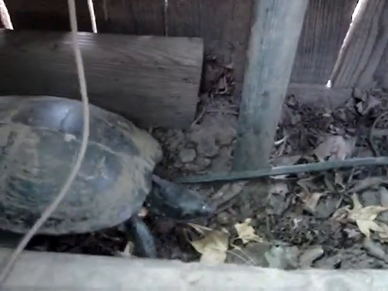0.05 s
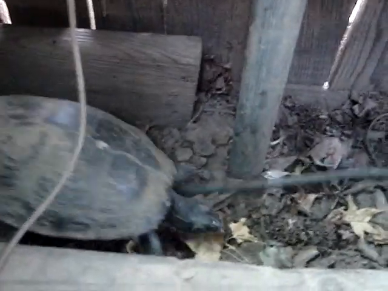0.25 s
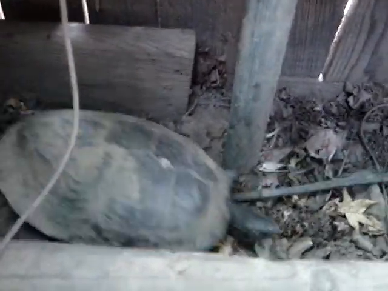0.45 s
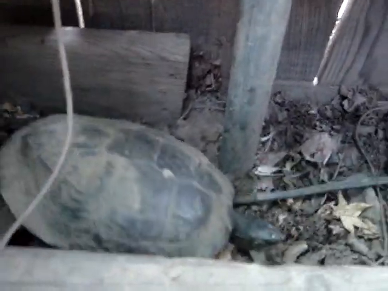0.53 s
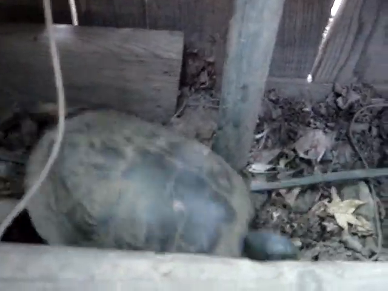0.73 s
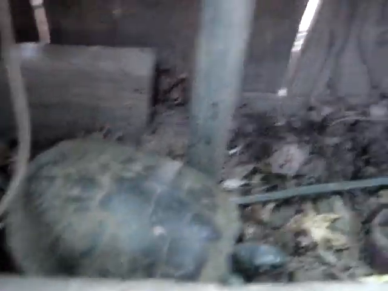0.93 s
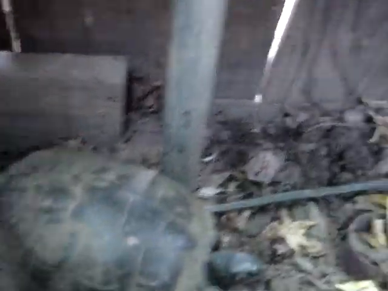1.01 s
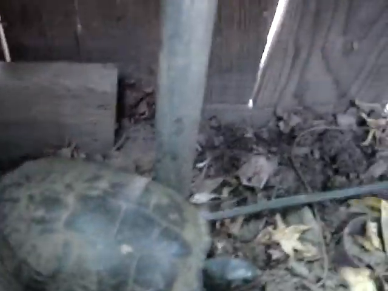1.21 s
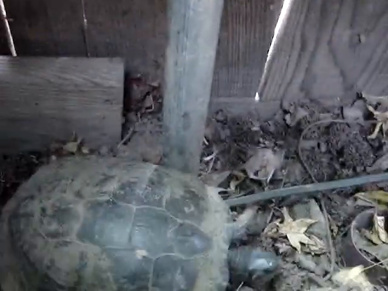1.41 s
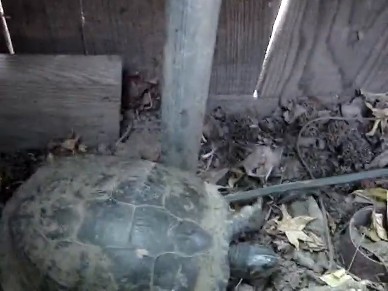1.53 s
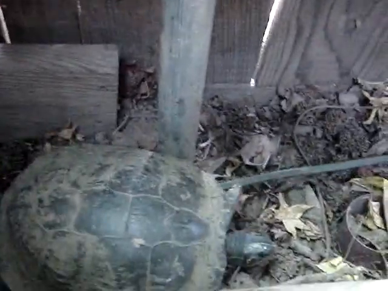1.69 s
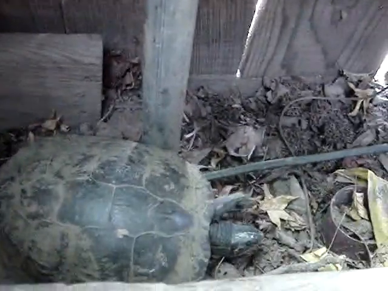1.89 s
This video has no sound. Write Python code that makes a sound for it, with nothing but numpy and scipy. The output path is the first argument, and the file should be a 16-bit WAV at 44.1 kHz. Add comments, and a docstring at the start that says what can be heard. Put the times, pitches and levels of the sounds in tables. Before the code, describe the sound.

Dry leaves crackle and twigs snap as a turtle crawls close by outdoors. Its claws scratch, its shell drags and knocks on wooden boards, and a few soft thumps sound before the rustling eases over a steady hiss.

```python
"""Turtle in dry leaves

A turtle crawls over dry leaves and dirt between wooden boards, outdoors. Leaves crackle under each
push, twigs snap and claws scratch; the shell drags along the wood and knocks against it, and both ring.
Four soft low thumps come with a short sizzle; behind it all are a steady hiss and a faint hum."""
import sys
import numpy as np
from scipy import signal
from scipy.fft import rfft, irfft
from scipy.io import wavfile

SR = 44100
rng = np.random.default_rng(int(sys.argv[2]) if len(sys.argv) > 2 else 0)


def output_pcm(signal):
    """Save a mono or channel-first signal as 16-bit PCM at the path in sys.argv[1].

    Samples are clipped to [-1, 1] before scaling.
    """
    pcm = np.clip(np.atleast_2d(signal).T, -1, 1) * 32767
    wavfile.write(sys.argv[1], SR, np.round(pcm).astype(np.int16))


N = 85995
T = np.arange(N) / SR


def from_db(db):
    """Decibels to gain."""
    return 10 ** (np.asarray(db) / 20)


def unit_rms(x):
    """Scale to rms 1."""
    return x / np.sqrt(np.mean(x ** 2) + 1e-20)


def drift(hz):
    """A smooth random wander, mostly slower than hz; rms 1."""
    step, settle = 20, 2000
    pole = np.exp(-2 * np.pi * hz * step / SR)
    noise = rng.standard_normal(N // step + settle + 2)
    slow = signal.lfilter([1], [1, -2 * pole, pole * pole], noise)[settle:]
    return np.interp(np.arange(N) / step, np.arange(len(slow)), unit_rms(slow))


def swell(at, rise, fall):
    """A rounded rise to 1 and fall back to silence."""
    return np.sin(np.pi / 2 * np.interp(T, [at - rise, at, at + fall], [0, 1, 0])) ** 2


def grains(per_s, spread_db):
    """Random clicks of uneven size."""
    clicks = (rng.random(N) < per_s / SR) * rng.choice([-1, 1], N)
    return clicks * from_db(spread_db * np.minimum(rng.exponential(1, N), 4)) + 1e-18


def bandpass(x, low, high, order=1):
    """Keep the band from low to high Hz."""
    return signal.sosfilt(signal.butter(order, [low, high], "band", fs=SR, output="sos"), x)


def ring(x, hz, t60):
    """One decaying mode; it radiates no deep bass."""
    radius, angle = from_db(-60 / (t60 * SR)), 2 * np.pi * hz / SR
    mode = signal.lfilter([.5, 0, -.5], [1, -2 * radius * np.cos(angle), radius ** 2], x + 1e-18)
    return bandpass(mode, hz / 2, hz * 2)


def coloured(sources, spectrum, flicker_db):
    """Half-octave bands, fed in turn from the sources, each with its own level and flicker; rms 1."""
    edges = 10800 / 2 ** np.arange(8.6, -.1, -.5)
    hz, db = np.transpose(spectrum)
    out = 0
    for k, (low, high) in enumerate(zip(edges, edges[1:])):
        level = np.interp(np.log(low * high) / 2, np.log(hz), db)
        band = bandpass(sources[k % len(sources)], low, high, order=2)
        out += band * from_db(level + flicker_db * drift(25))
    return unit_rms(out)


def background():
    """A bed of even outdoor hiss and a faint hum whose phase wavers."""
    # hum tones: (frequency [Hz], level [dB])
    tones = [(118.5, -57), (1039, -57)]
    # colour of the outdoor air: (frequency [Hz], relative density [dB])
    air = [(30, -24), (60, -2), (100, 4), (200, 1), (350, -10.5), (600, -4), (1000, -4), (1600, -7),
           (3500, -12), (7000, -18), (10000, -52.5)]
    hum = sum(from_db(db) * unit_rms(np.sin(2 * np.pi * hz * T + 0.25 * drift(24))) for hz, db in tones)
    hiss = coloured(rng.standard_normal((2, N)), air, flicker_db=1.2)
    return hum + from_db(-45) * hiss


def board_reflections(x):
    """A short spray of reflections between the boards, starting after 4 ms."""
    t, t60 = T[:SR // 4], 0.097
    tail = rng.standard_normal(len(t)) * from_db(-60 * t / t60) * (t > .004)
    return from_db(-18.5) * signal.fftconvolve(x, tail / np.linalg.norm(tail))[:N]


def thumps():
    """Soft, one-sided pulses of pressure, each topped with a short bright sizzle."""
    # thump cues: (start [s], peak [dB], sizzle level [dB])
    cues = [(0.419, -31.5, -40), (0.721, -34, -31), (1.212, -34.5, -36.5), (1.526, -33, -30.5)]
    # colour of the sizzle: (frequency [Hz], relative density [dB])
    colour = [(2000, -25), (4500, -32), (7000, 32), (10000, -6.5)]
    sizzle = coloured(rng.standard_normal((2, N)), colour, flicker_db=-0.5)
    out = 0
    for start, db, sizzle_db in cues:
        out += from_db(db) * swell(start + 0.0045, rise=0.0045, fall=0.044)
        out += from_db(sizzle_db) * sizzle * swell(start + 0.006, rise=0.006, fall=0.016)
    return out


def claw_scratches():
    """Fast slips of a claw ring a leaf in one broad resonance."""
    # claw strokes: (peak time [s], rise [s], fall [s], level [dB], centre [Hz], width [Hz])
    strokes = [(0.201, 0.072, 0.036, -39.5, 900, 250), (0.399, 0.098, 0.092, -31.5, 3660, 915),
               (.44, 0.015, 0.045, -34, 2030, 457), (.945, 0.064, 0.035, -35, 2130, 900),
               (1.08, 0.028, 0.032, -45, 834, 199), (1.85, .14, 0.43, -44.5, 1630, 790)]
    out = 0
    for at, rise, fall, db, hz, width in strokes:
        low, high = max(hz - width / 2, hz / 2), hz + width / 2
        slips = grains(per_s=3100, spread_db=4)
        rasp = bandpass(bandpass(slips, low, high), low, high)
        out += from_db(db) * swell(at, rise, fall) * unit_rms(rasp)
    return out


def shell_on_boards():
    """The shell's stick-slip drags and its knocks drive the same modes of shell and board."""
    # drags along the wood: (peak time [s], rise [s], fall [s], level [dB], upper mode offset [dB])
    drags = [(.27, 0.17, 0.14, -45, -5), (.37, 0.059, 0.063, -34.5, 3), (0.524, 0.069, 0.066, -34.5, -7.5),
             (0.598, 0.039, 0.18, -37.5, -5.5), (0.697, 0.048, 0.065, -30.5, -4),
             (0.761, .025, 0.063, -30.5, -5.5), (0.861, 0.03, 0.029, -31.5, -4.5),
             (1.339, 0.1, 0.055, -34, -4.5), (1.407, 0.019, 0.033, -36.5, 2)]
    # a bump, a hard rattling knock, two light taps: (start [s], strength [dB], contact length [s])
    knocks = [(.361, -15, 0.0032), (.7259, -11.5, 0.00084), (.7282, -16.5, 0.0013), (.7305, -17.5, .001),
              (.7328, -31.5, 0.0024), (0.857, -31, 0.0013), (1.404, -35, .0005)]
    # shell and board ringing together: (frequency [Hz], drag gain [dB], knock gain [dB], t60 [s])
    modes = [(196, -19.5, -4, 0.043), (292.4, 5, -26, 0.022), (392.5, -12.5, 4, 0.024),
             (707, -10, -1.5, 0.028), (887, 6.5, 3.5, 0.017), (1060, -21, -11, .025),
             (1177, -15, -1.5, 0.028)]
    upper_above_hz = 600
    lower = upper = blows = out = 0
    for at, rise, fall, db, upper_db in drags:
        pressure = from_db(db) * swell(at, rise, fall)
        lower += pressure
        upper += pressure * from_db(upper_db)
    for start, db, length in knocks:
        contact = swell(start + length / 2, length / 2, length / 2)   # shorter is brighter
        blows += from_db(db) * contact / contact.sum()
    slips = grains(per_s=700, spread_db=3)
    slips /= np.std(sum(from_db(db) * ring(slips, hz, t60) for hz, db, _, t60 in modes))
    for hz, drag_db, knock_db, t60 in modes:
        friction = slips * (upper if hz > upper_above_hz else lower)
        out += ring(from_db(knock_db) * blows + from_db(drag_db) * friction, hz, t60)
    return out


def snaps():
    """A leaf or twig breaks: a fast-dying burst of noise around one broad pitch."""
    # breaks: (start [s], level [dB], t60 [s], centre [Hz])
    breaks = [(.174, -32.5, 0.043, 4240), (0.204, -33.5, .03, 4000), (0.228, -30, 0.1, 6000),
              (.305, -27, .03, 3520), (0.342, -46, 0.018, 2500), (0.36, -37, 0.038, 2160),
              (.4, -27, .025, 3400), (0.416, -19, 0.023, 2250), (0.676, -29, 0.036, 4970),
              (.691, -17.5, 0.01, 7500), (0.704, -30.5, 0.04, 2500), (.719, -32, 0.025, 3500),
              (.7253, -12.5, 0.014, 1410), (0.754, -33, 0.034, 3280), (0.764, -16, 0.019, 3100),
              (0.778, -20, .025, 4000), (0.804, -31, 0.041, 2800), (0.849, -32.5, 0.071, 2600),
              (0.9, -37, .03, 7150), (.928, -31, 0.058, 8000), (0.959, -17, 0.013, 2260),
              (0.958, -28.5, 0.062, 9000), (.998, -30.5, 0.033, 4000), (1.021, -28.5, 0.015, 4970),
              (1.2101, -25.5, 0.029, 5400), (1.216, -15, 0.011, 7000), (1.2291, -15, 0.004, 9000),
              (1.252, -30.5, 0.055, 3000), (1.333, -31, 0.012, 5970), (1.347, -36, 0.008, 6000),
              (1.386, -25, 0.022, 5400), (1.404, -26.5, 0.028, 1200), (1.41, -23.5, 0.031, 1820),
              (1.468, -26.5, 0.032, 4360), (1.5264, -30, .02, 5500), (1.719, -33.5, 0.022, 4200),
              (1.748, -33, 0.041, 7460), (1.831, -35, 0.02, 7000)]
    attack_s, octave_loss_db = .0012, 5.5
    out, size = np.zeros(N + SR), SR // 10
    t = T[:size]
    hz = np.maximum(np.fft.rfftfreq(size, 1 / SR), 1)
    for at, db, t60, centre_hz in breaks:
        colour = from_db(-octave_loss_db * np.log2(hz / centre_hz) ** 2)
        burst = unit_rms(irfft(rfft(rng.standard_normal(size)) * colour, size))
        envelope = np.minimum(t / attack_s, 1) * from_db(db - 60 * t / t60)
        start = int(at * SR)
        out[start:start + size] += burst * envelope
    return out[:N]


def leaf_crackle():
    """Clumps of tiny fractures under the turtle's weight; a fine, flickering high hiss follows them."""
    # how hard the turtle pushes on leaves and dirt: (time [s], level [dB])
    push = [(0, -40.5), (.06, -47), (.165, -43.5), (.19, -35.5), (.23, -35.5), (.29, -35), (.405, -30.5),
            (.48, -38), (.56, -42), (.66, -36), (.72, -27.5), (.775, -31), (.83, -37), (.88, -37),
            (.93, -36), (1.0, -40), (1.06, -47), (1.12, -40.5), (1.19, -44.5), (1.27, -39), (1.41, -34),
            (1.52, -42), (1.55, -55.5), (1.70, -53.5), (1.83, -41.5), (1.95, -43)]
    # colour of crushed leaves: (frequency [Hz], relative density [dB])
    crush_colour = [(150, -2.5), (550, -0.5), (900, -1), (1500, -3), (2300, -1), (3600, 0.5), (5200, -5.5),
                    (8000, -8.5), (10000, -33)]
    # colour of the fast-flickering high hiss: (frequency [Hz], relative density [dB])
    treble_colour = [(2500, -29), (5000, -7.5), (7000, -3), (10000, -1)]
    clump_hz, clump_db, treble_swing_db = 69, 2.12, 16.5
    cracks = [grains(per_s=6000, spread_db=4) for _ in range(3)]
    crush = coloured(cracks, crush_colour, flicker_db=1.7)
    crackle = unit_rms(crush * from_db(clump_db * drift(clump_hz)))
    treble_gain = from_db(treble_swing_db * np.minimum(drift(hz=69), 1.3))
    high_hiss = coloured(rng.standard_normal((2, N)), treble_colour, flicker_db=3)
    treble_flicker = unit_rms(high_hiss * treble_gain)
    return (crackle + from_db(-8.5) * treble_flicker) * from_db(np.interp(T, *np.transpose(push)))


def scene():
    """The turtle and its reflections, mixed in mono with the thumps over the outdoor bed."""
    turtle = leaf_crackle() + snaps() + claw_scratches() + shell_on_boards()
    return (turtle + board_reflections(turtle) + thumps() + background())[None]


def record(dry):
    """A steep low-pass takes off the top."""
    cutoff_hz = 10020
    return signal.sosfilt(signal.ellip(12, .2, 75, cutoff_hz, fs=SR, output="sos"), dry)


dry = scene()
out = record(dry)
output_pcm(out)
```